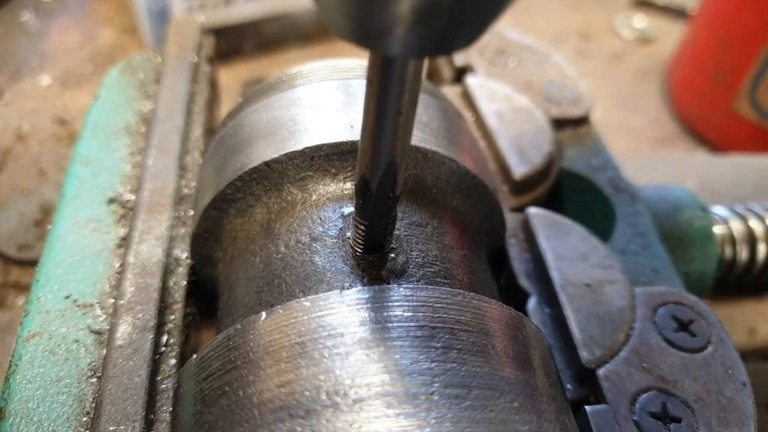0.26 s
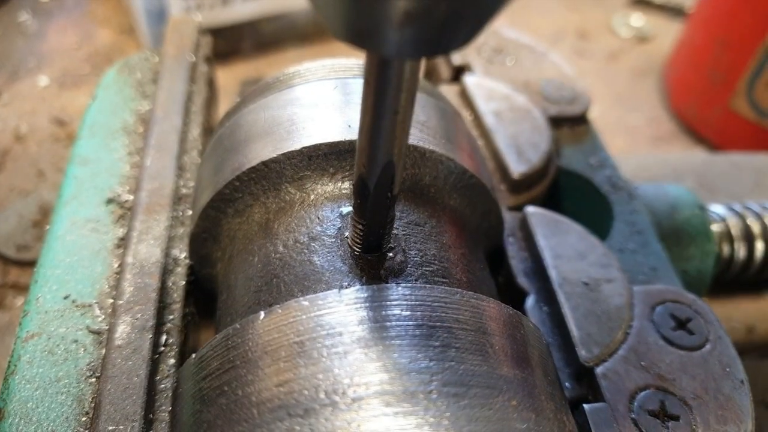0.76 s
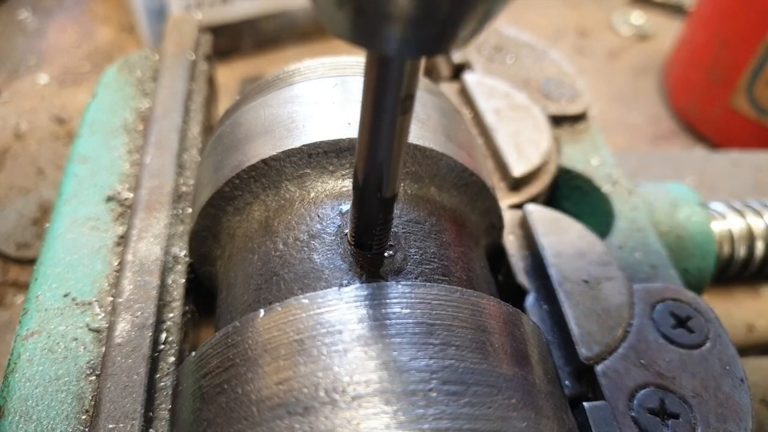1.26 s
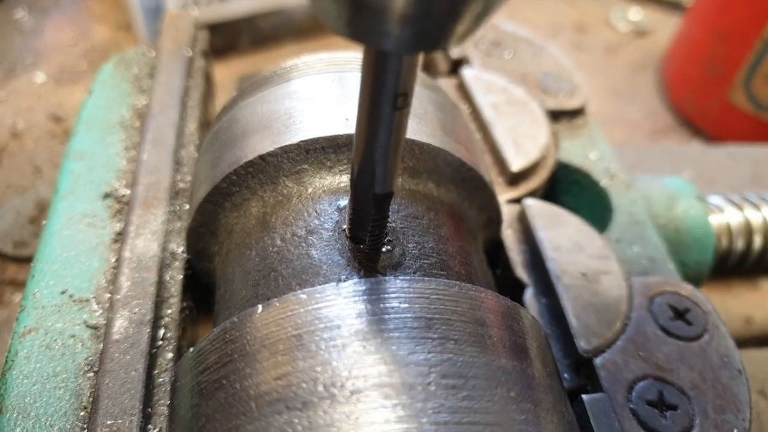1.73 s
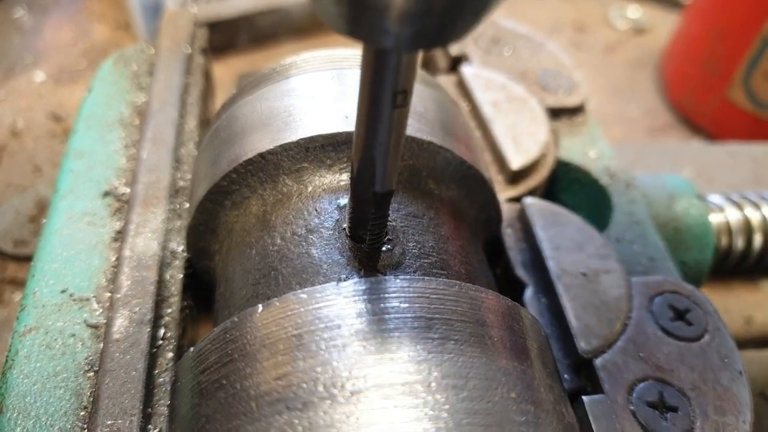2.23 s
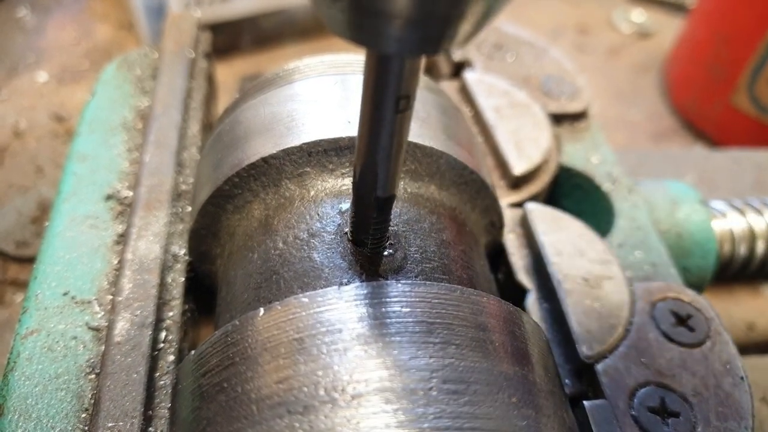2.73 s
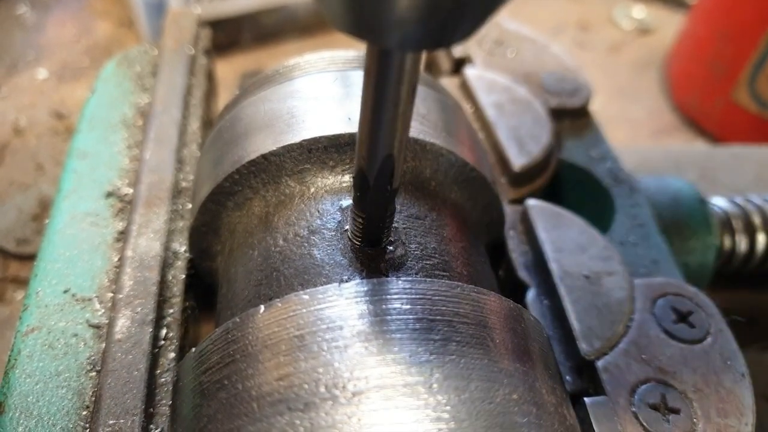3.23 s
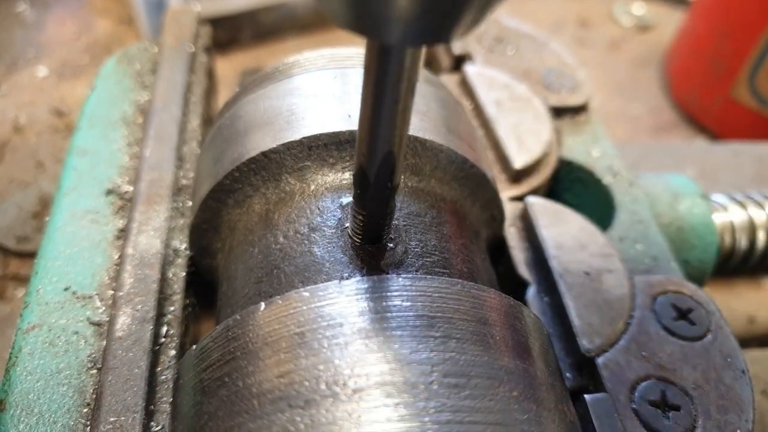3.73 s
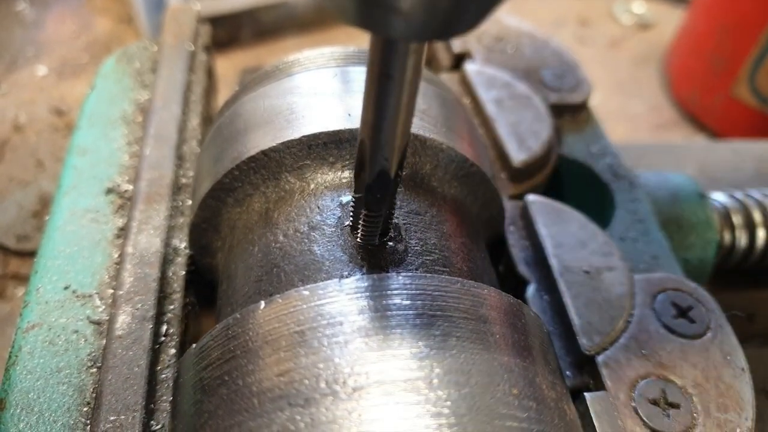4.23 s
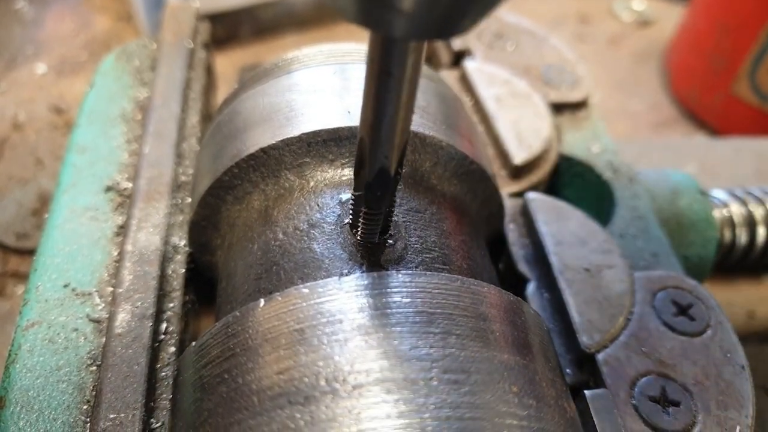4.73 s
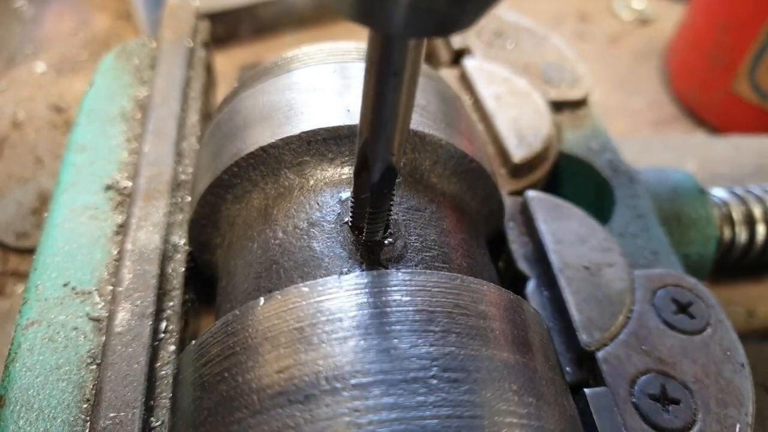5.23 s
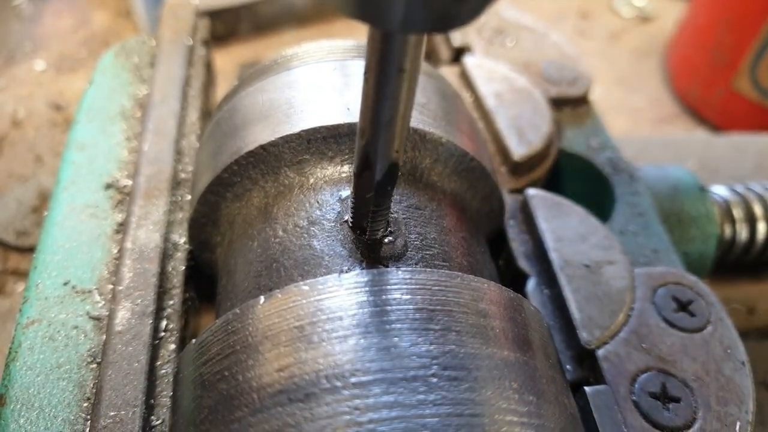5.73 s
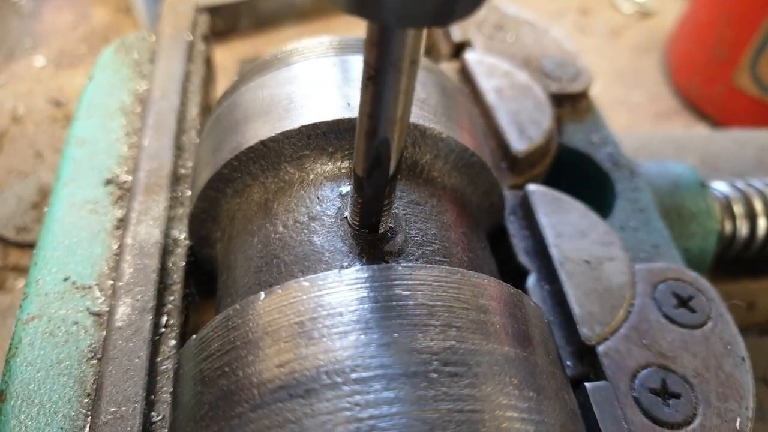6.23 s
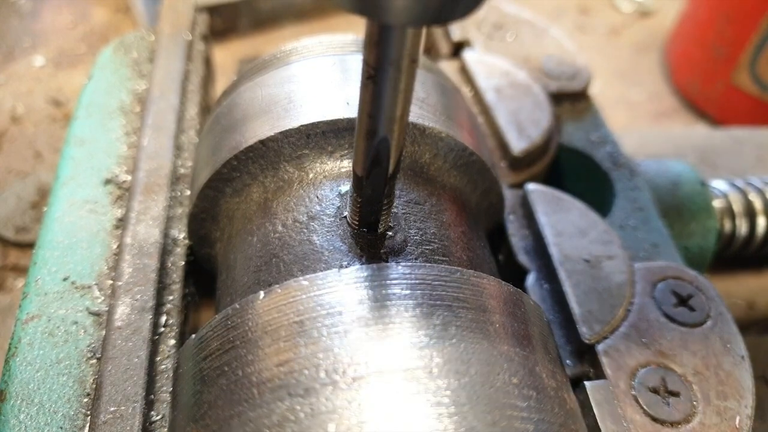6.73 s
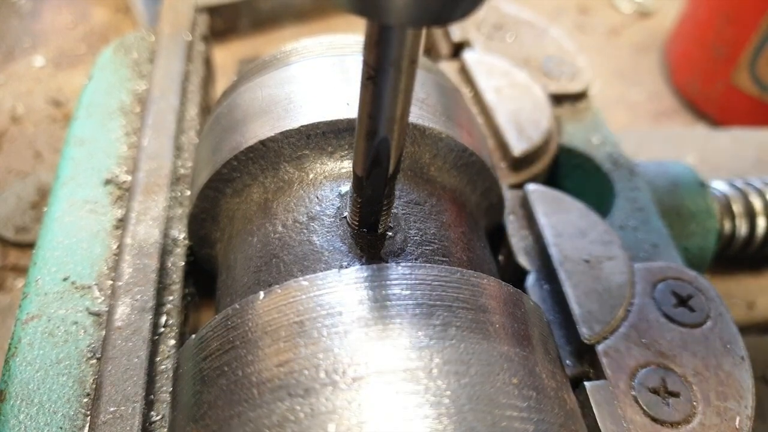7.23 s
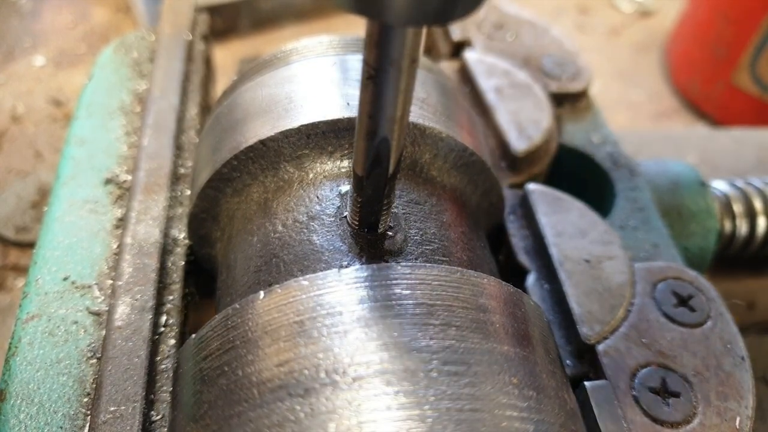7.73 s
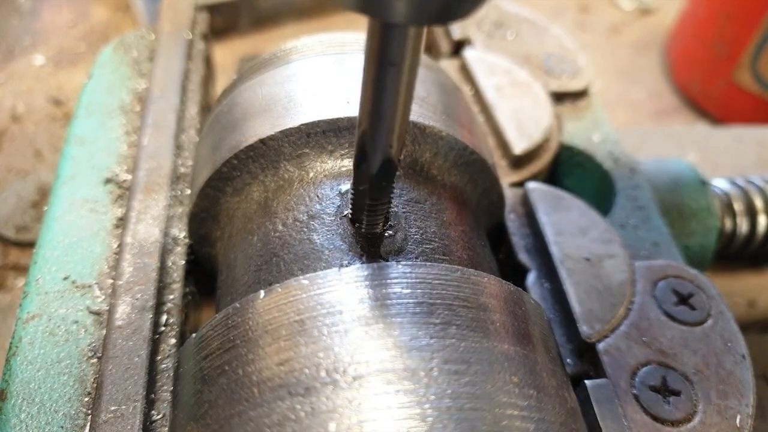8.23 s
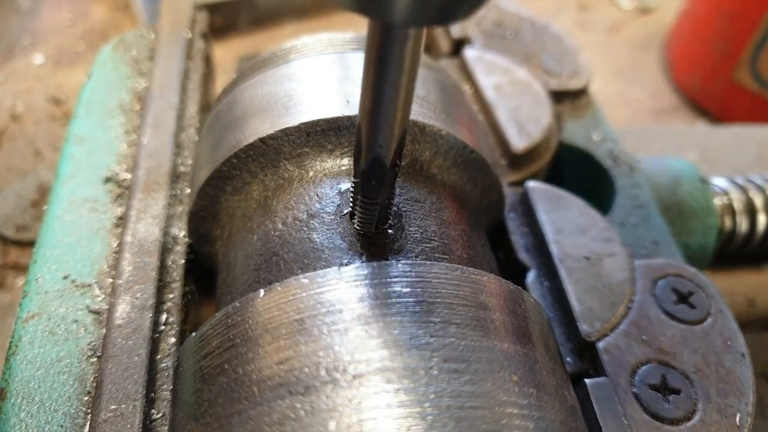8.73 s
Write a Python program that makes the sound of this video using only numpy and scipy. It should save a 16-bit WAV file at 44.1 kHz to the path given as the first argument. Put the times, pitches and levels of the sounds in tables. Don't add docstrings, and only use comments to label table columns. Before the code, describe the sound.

Close-miked metal tapping by hand: a first creaky run of clicks, a long pause with cloth and bench bumps, then more brief bursts about once a second. Each click is a hard, dry snap with a tiny steel ring and little room. After a quiet gap with a faint steel squeak, three stronger bites and one lone snap follow, over low rumble and faint hiss.

```python
import sys
import numpy as np
from scipy import signal
from scipy.fft import rfft, irfft
from scipy.io import wavfile
from scipy.ndimage import uniform_filter1d

SR = 44100
rng = np.random.default_rng(int(sys.argv[2]) if len(sys.argv) > 2 else 0)


def wrap_up_sound(samples):
    columns = np.atleast_2d(samples).T
    tamed = np.clip(columns, -1, 1)
    steps = np.round(tamed * 32767).astype(np.int16)
    wavfile.write(sys.argv[1], SR, steps)


def voltage_ratio(decibels):
    exponent = np.asarray(decibels, float) / 20
    return 10 ** exponent


N = 395350
LEFT_LAG = 18

# frequency in Hz, left level in dB, right level in dB.
CRACK = [(658, -8.5, -8), (1078, -37, -24), (2220, 4.5, -19), (2960, -31, -17.5), (3760, 6, -18.5),
         (5040, 3.5, -25.5), (5460, 1.5, -22), (6480, -22, -19), (7610, -47.5, -20.5), (8800, -27, -4.5),
         (11300, -7, -1), (12700, -6, -3.5), (14800, -8.5, -18), (16290, -54.5, -33)]
# share of the pitch, level in dB, t60 in s.
PART = [(0.998, 4, 0.02), (1.05, -4, 0.018), (1.1, -30.5, 0.013), (0.96, -16.5, 0.0067),
        (1.5, -19.5, 0.012)]
# frequency in Hz, level in dB, t60 in s.
VICE = [(480.3, -7, 0.046), (541, -14, 0.028)]
# frequency in Hz, left level in dB, right level in dB.
LOW = [(22.05, -28.5, -13), (42.2, -1.5, -12), (60.3, -6, 8.5), (82.3, -16, 4), (108, -38, 11.5),
       (130, -7.5, 10), (166.7, -11, 2.5), (202.8, -5, -0.5), (273.3, -18, -22), (288, -10, -18.5),
       (397, -22.5, -26), (482, -24.5, -22.5), (647, -38.5, -32.5), (890, -47.5, -45.5)]
# frequency in Hz, left level in dB, right level in dB.
AIR = [(614, -11, -7), (915, -12, -17), (1410, -7.5, -11.5), (1890, 6, -16.5), (2655, -7.5, -18.5),
       (3570, 10.5, -26), (4300, 6.5, -28.5), (4950, 5, -30), (5800, -19, -18.5), (7880, -35, -26.5),
       (9300, -40.5, -19), (10960, -16.5, -17), (14950, -15.5, -17)]
# start in s, held in s, cavity air in dB, broad rub in dB.
STROKES = [(0, 0.58, -69, -67), (0.463, 0.033, -53, -59.5), (.6, 0.44, -65, -68), (1.025, 0.41, -74, -65.5),
           (1.111, 0.041, -74, -60), (1.215, 0.064, -58, -63), (1.3, 0.37, -70, -67.5),
           (1.66, 0.2, -58, -72), (2.2, 0.24, -59, -69.5), (2.5, 0.25, -64.5, -86), (2.81, 0.37, -62, -77),
           (3.138, 0.04, -59, -70), (3.278, 0.47, -60.5, -72), (3.74, 0.11, -58.5, -65.5),
           (3.9, 0.015, -60, -73), (4.002, 0.5, -63, -91), (5.255, 0.13, -60.5, -85),
           (5.56, 0.23, -65, -86), (5.754, 0.087, -61, -73.5), (6.6, 0.13, -68.5, -77.5),
           (7.555, 0.064, -66, -91), (7.763, 0.082, -64.5, -90), (8.1, 0.37, -66.5, -80.5),
           (8.7, 0.2, -65.5, -76)]
# start in s, force in dB, part ring in dB, vice knock in dB.
SHALLOW_SLIPS = [(0.1018, -29, -47, -76), (0.152, -26, -50, -74), (0.1943, -26, -67, -77),
                 (0.235, -26.5, -47, -69), (0.2729, -27, -56, -72), (0.3124, -24.5, -50, -73),
                 (0.3866, -29.5, -69.5, -60), (2.067, -19.5, -34, -53), (2.259, -26, -37, -53),
                 (2.315, -25.5, -39, -44), (2.367, -23, -37, -44), (2.4272, -22.5, -39.5, -43.5),
                 (2.4669, -20.5, -35.5, -50.5), (3.3671, -23.5, -50, -57), (3.3989, -24, -41, -49.5),
                 (3.4273, -25, -45, -51.5), (3.4521, -24.5, -47, -46), (3.477, -20.5, -46, -49),
                 (3.5012, -24.5, -39, -48), (3.5235, -22, -43, -45.5), (3.5495, -21, -36, -56.5),
                 (4.399, -27, -40.5, -46.5), (4.4176, -27, -47, -52), (4.4339, -25, -36.5, -53),
                 (4.4504, -24, -42, -77), (4.4692, -26, -44, -76), (4.494, -31, -42, -53.5)]
DEEP_SLIPS = [(6.33, -33.5, -44, -46), (6.35, -23.5, -41, -47.5), (6.3708, -25, -36, -50),
              (6.395, -20.5, -47, -54), (6.4243, -23.5, -43.5, -67), (6.4532, -20.5, -36, -50.5),
              (6.5137, -23.5, -43, -53), (7.0357, -20.5, -44.5, -54), (7.4115, -26.5, -40.5, -48),
              (7.4296, -24, -47, -58), (7.4414, -21.5, -40, -44), (7.4556, -22, -59, -52),
              (7.4687, -25, -54, -42), (7.4835, -19.5, -43.5, -62), (7.499, -19.5, -46, -45),
              (7.5147, -20, -45, -40), (7.5341, -19.5, -39.5, -53), (7.5577, -24.5, -44.5, -53),
              (8.4356, -23.5, -65, -66), (8.455, -19, -52, -50), (8.4719, -19, -42, -70),
              (8.4873, -16, -50, -45.5), (8.5035, -15.5, -43, -56), (8.5214, -18.5, -48.5, -67),
              (8.5395, -20, -49, -56), (8.5615, -23.5, -44, -60), (8.5869, -21.5, -48, -55),
              (8.6131, -23, -48, -59), (8.6447, -23.5, -44.5, -66)]


def rms_one(x):
    return x / np.sqrt(np.mean(x ** 2) + 1e-20)


def colour(x, table, low_hz=10, high_hz=20000):
    hz = np.arange(1, 4098) * SR / 8192
    points = np.transpose(table)
    edges_db = -10 * np.log10((1 + (low_hz / hz) ** 12) * (1 + (hz / high_hz) ** 200))
    level_db = np.array([np.interp(np.log(hz), np.log(points[0]), db) + edges_db for db in points[1:]])
    cepstrum = irfft(np.maximum(level_db, -150) * np.log(10) / 20)
    cepstrum[:, 1:4096] *= 2
    cepstrum[:, 4097:] = 0
    impulse = irfft(np.exp(rfft(cepstrum)))
    return signal.oaconvolve(x * np.ones((2, 1)), impulse, axes=1)[:, :N]


def drift(rate_hz):
    r = np.exp(-80 * np.pi * rate_hz / SR)
    slow = signal.lfilter([1], [1, -2 * r, r * r], rng.standard_normal(N // 40 + 2002))[2000:]
    return np.interp(np.arange(N) / 40, np.arange(len(slow)), rms_one(slow))


def even(x, seconds, share):
    power = uniform_filter1d(x ** 2, max(round(seconds * SR), 1)) + 1e-20
    return rms_one(x / power ** (share / 2))


def held(starts, lengths, db, rest_db, rise_s, fall_db_per_s):
    level = np.full(N, float(rest_db))
    sink = fall_db_per_s * np.arange(N) / SR
    for s, length, top_db in zip(starts, lengths, db):
        span = slice(round(s * SR), round((s + length) * SR))
        level[span] = np.maximum(level[span], top_db)
    return uniform_filter1d(np.maximum.accumulate(level + sink) - sink, max(round(rise_s * SR), 1))


def strikes(times, db):
    out = np.full(N, 1e-18)
    out[np.round(np.asarray(times) * SR).astype(int)] = voltage_ratio(db)
    return out


def fade(clicks, t60, rise_s):
    r = voltage_ratio(-60 / (t60 * SR))
    soft = np.exp(-1 / (rise_s * SR))
    return signal.lfilter([1 - soft], [1, -soft], signal.lfilter([1], [1, -r], clicks))


def ring(times, db, modes, spread_db, rise_s):
    out = 0
    chance = rng.standard_normal((len(times), len(modes), 2))
    last = np.searchsorted(times, np.arange(N) / SR).clip(1) - 1
    for k, (hz, level_db, t60) in enumerate(modes):
        height = fade(strikes(times, db + level_db + spread_db * chance[:, k, 0]), t60, rise_s)
        detuned_hz = hz * (1 + 0.016 * chance[last, k, 1])
        out = out + height * np.sin(2 * np.pi * np.cumsum(detuned_hz) / SR)
    return out


def chime(times, db, modes, pitch_hz, spread_db, rise_s):
    out = np.zeros(N + 4000)
    t = np.arange(4000) / SR
    share, level_db, t60 = np.transpose(modes)[:, :, None]
    chance = rng.standard_normal((len(times), len(modes), 1))
    shape = voltage_ratio(level_db - 60 * t / t60) * (1 - np.exp(-t / rise_s))
    for s, top_db, hz, luck in zip(times, db, pitch_hz, chance):
        at = round(s * SR)
        modes_now = voltage_ratio(top_db + spread_db * luck) * shape * np.sin(2 * np.pi * share * hz * t)
        out[at:at + 4000] += modes_now.sum(0)
    return out[:N]


def room_air(grain):
    band_edges_hz = [520, 1150, 1650, 2400, 3100, 4600, 5600, 6900]
    s, length, air_db, _ = np.transpose(STROKES)
    left_db = held(s, length, air_db, rest_db=-72, rise_s=0.02, fall_db_per_s=65.5) + 3 + 1.2 * drift(25)
    air = np.zeros((2, N))
    for low_hz, high_hz in zip(band_edges_hz, band_edges_hz[1:]):
        air += colour(grain[:2], AIR, low_hz, high_hz) * voltage_ratio(1.7 * drift(14) + 0.85 * drift(25))
    return np.array([voltage_ratio(left_db) * rms_one(air[0]), voltage_ratio(-80) * rms_one(air[1])])


def cloth_rub(grain):
    # frequency in Hz, level in dB.
    rub_colour = [(500, 1), (900, -7), (1500, 2.5), (2500, 0.5), (5800, 0), (6500, -10), (7000, -21.5)]
    s, length, _, rub_db = np.transpose(STROKES)
    rub_db = held(s, length, rub_db, rest_db=-82.5, rise_s=0.02, fall_db_per_s=65.5)
    cloth = grain[2] * voltage_ratio(1.2 * drift(60))
    top = voltage_ratio(-10 * (np.arange(N) > 1.59 * SR))
    body = colour(cloth, rub_colour, low_hz=400, high_hz=5400)
    full = colour(cloth, rub_colour, low_hz=400, high_hz=7000)
    rub = rms_one((1 - top) * body + top * full)
    return voltage_ratio(rub_db + 8 + 1.2 * drift(12)) * rub * [[1], [.025]]


def hiss(grain):
    return voltage_ratio(-81.5) * rms_one(colour(grain[2:], AIR, low_hz=8000, high_hz=14600))


def hand_effort():
    # start in s, held in s, level in dB.
    heaves = [(0, 0.25, -35), (.25, 0.12, -26), (.45, .22, -41.5), (1.122, 0.22, -39.5),
              (1.58, 0.066, -38.5), (1.749, 0.39, -35), (2.218, 0.28, -28.5), (2.549, 0.13, -34),
              (3.31, .08, -32.5), (3.398, 0.14, -28.5), (3.6, 0.21, -36.5), (4.331, 0.14, -26.5),
              (4.561, 0.077, -34), (5.3, 0.22, -52), (5.78, 0.16, -42.5), (6.314, 0.17, -24),
              (6.58, 0.11, -33), (6.8, 0.47, -33), (7.369, 0.18, -27), (7.651, 0.27, -44),
              (7.88, 0.43, -35.5), (8.38, 0.25, -28.5), (8.699, 0.1654, -37.5)]
    return held(*np.transpose(heaves), rest_db=-51, rise_s=0.013, fall_db_per_s=161)


def tremble(low, effort_db):
    # frequency in Hz, level above the effort in dB, t60 in s.
    swing_modes = [(131, -1.5, 0.073)]
    shake = voltage_ratio(effort_db - 4.5 + 1.8 * drift(10.8)) * even(low[1], seconds=.04, share=.6)
    slip_s = np.transpose(SHALLOW_SLIPS + DEEP_SLIPS)[0]
    slip_effort_db = effort_db[(slip_s * SR).astype(int)]
    shake += ring(slip_s, slip_effort_db, swing_modes, spread_db=-4.0, rise_s=0.0016)
    return shake * [[-.06], [1]]


def hum(low, effort_db):
    # start in s, held in s, level above rest in dB.
    swells = [
        (0.2, 0.15, -2),
        (1.55, 0.31, 2.5),
        (2.75, 0.27, 3),
        (3.55, 0.32, 4.5),
        (4.15, 0.18, 2.5),
        (5.2, 0.17, 5.5),
        (7.4, 0.18, -3),
        (8.4, 0.31, 1),
    ]
    swell_db = held(*np.transpose(swells), rest_db=0, rise_s=0.053, fall_db_per_s=40)
    follow_db = 0.13 * (effort_db - effort_db.mean())
    return voltage_ratio(-49.5 + swell_db + follow_db + 2.0 * drift(13.0)) * rms_one(low[0]) * [[1], [-.2]]


def sway(effort_db):
    slow = colour(rng.standard_normal(N), LOW, high_hz=96.46)[1]
    sway_db = -51 + 0.079 * (effort_db - effort_db.mean()) + 2.0 * drift(4.1)
    return voltage_ratio(sway_db) * even(slow, seconds=0.09, share=0.46) * [[-.1], [1]]


def cracks(s, burst, crack_db, vice_db, teeth_db, edge_db, edge_left_db):
    dry_crack = fade(strikes(s, crack_db + 1.0), t60=0.0043, rise_s=0.000324)
    knock = fade(strikes(s, vice_db + 9.5), t60=0.01645, rise_s=0.00057)
    teeth = fade(strikes(s, teeth_db + 12.0), t60=0.015, rise_s=.0002)
    edge = [fade(strikes(s, edge_db + 19 + side_db), t60=0.007, rise_s=0.00031)
            for side_db in (edge_left_db, -.3 * edge_left_db)]
    out = colour(burst * dry_crack, CRACK, low_hz=1260, high_hz=5580)
    out += colour(burst * knock, CRACK, low_hz=570, high_hz=1337)
    out += colour(burst * teeth, CRACK, low_hz=5560, high_hz=7030)
    return out + colour(burst * edge, CRACK, low_hz=8100)


def after_sound(s, noise, force_db):
    # frequency in Hz, left level in dB, right level in dB.
    after_colour = [(710, -25.5, -25), (1100, -30.5, -30.5), (2110, -10.5, -23), (2830, -23.5, -32.5),
                    (3380, -13.5, -33.5), (5090, -14, -27), (5800, -21.5, -38), (6740, -24, -45.5),
                    (7540, -41.5, -57), (8360, -51, -29), (10160, -31, -24.5), (12600, -21, -24.5),
                    (14200, -23.5, -25), (14940, -33.5, -59), (16070, -59, -70.5)]
    near = fade(strikes(s, 2 * force_db - 1.5), t60=0.024, rise_s=0.006)
    far = fade(strikes(s, 2 * force_db - 25.0), t60=0.17, rise_s=0.0036)
    return colour(noise * np.sqrt(near + far), after_colour, high_hz=14800)


def teeth_ring(s, teeth_db, teeth_hz, upper_db, upper_hz):
    # share of the pitch, level in dB, t60 in s.
    lower_modes = [(0.99, -0.5, 0.0065), (1.034, -10, 0.0068), (0.84, -25, .006), (0.91, -29, .006)]
    upper_modes = [(1, -9.5, 0.0041), (0.98, -6, 0.011)]
    lower = chime(s, teeth_db + 12.0, lower_modes, teeth_hz, spread_db=3.5, rise_s=0.00029)
    upper = chime(s, teeth_db + 5.5 + upper_db, upper_modes, upper_hz, spread_db=0.5, rise_s=0.00054)
    return lower * voltage_ratio([[0], [-18]]) + upper * voltage_ratio([[0], [-16]])


def jaw_and_core(s, crack_db):
    # frequency in Hz, level in dB, t60 in s.
    jaw_modes = [(4080, -24, 0.011)]
    core_modes = [(3540, -23, 0.049), (3840, -12.5, 0.011), (4087, -13.5, 0.021), (4190, -25.5, 0.013),
                  (4870, -13, 0.01), (5520, -11.5, 0.0084)]
    unit_hz = np.ones(len(s))
    jaw = chime(s, crack_db, jaw_modes, unit_hz, spread_db=2.0, rise_s=0.00045)
    core = chime(s, crack_db - 2.0, core_modes, unit_hz, spread_db=0.5, rise_s=0.00019)
    return jaw * [[0], [1]] + core * voltage_ratio([[0], [-19]])


def part_ring(s, part_db, part_hz, noise):
    rough = voltage_ratio(3 * rms_one(uniform_filter1d(noise, 150)))
    blow = chime(s, part_db - 18.5, PART, part_hz, spread_db=7.5, rise_s=0.00028)
    built = chime(s + 0.001822, part_db, PART, part_hz, spread_db=2.5, rise_s=0.0014)
    return blow * [[1], [0]] + built * rough * voltage_ratio([[0], [-19]])


def vice_ring(s, vice_db):
    vice = ring(s, vice_db - 2.5, VICE, spread_db=1.5, rise_s=0.0016)
    return np.array([-.5 * np.roll(vice, -LEFT_LAG), vice])


def shank_ring(s):
    # frequency in Hz, level in dB, t60 in s.
    shank_modes = [(2940, 0, .1), (4700, -10, .05), (6600, -15, .06), (9060, 1, .12), (9250, -3, .04)]
    # time in s, level in dB.
    depth_levels = [
        (.3, -50),
        (.39, -70),
        (2.07, -50.5),
        (2.4, -59.5),
        (4.45, -71),
        (6.4, -59.5),
        (8.5, -67),
    ]
    shank_db = np.interp(s, *np.transpose(depth_levels))
    return ring(s, shank_db, shank_modes, spread_db=3, rise_s=.0005) * voltage_ratio(2.5 * drift(120)) * [[.08], [1]]


def slips():
    # start in s, crack above force in dB, left bright edge in dB, upper teeth in dB, their pitch in Hz.
    bites = [(0, -1, 1.5, -3, 6330), (.35, 6.5, 1, -18, 6300), (2.0, 1.5, 2.5, 1, 6340),
             (2.2, 5, 1.5, -33, 6170), (3.3, 0.5, -7, -8, 6400), (3.44, 2, -2.5, -5, 6700),
             (4.3, 3, 1, -9.5, 6020), (6.2, 2, 1, 1.5, 6480), (6.9, 1.5, 3, -9, 6300),
             (7.3, 1.5, 2, -6.5, 6400), (8.3, -0.5, 4, -9.5, 6330)]
    # teeth in dB, bright edge in dB.
    slip_rings = [(-32.5, -44), (-35.5, -37), (-35, -35), (-39, -37), (-32.5, -36), (-38, -35.5),
                  (-31, -40), (-39, -36), (-48, -36.5), (-47, -32.5), (-60, -29), (-40.5, -28.5),
                  (-41.5, -29), (-30.5, -36.5), (-32.5, -36), (-39, -31), (-35, -29.5), (-33, -28),
                  (-33.5, -28), (-32, -28), (-36.5, -27), (-39, -44), (-31, -37.5), (-31, -38.5),
                  (-27, -37), (-32.5, -34.5), (-33, -34.5),
                  (-37, -39.5), (-29.5, -33.5), (-30.5, -35.5), (-26, -32.5), (-25.5, -35), (-28.5, -34),
                  (-30, -37.5), (-39.5, -38.5), (-37, -40), (-34.5, -36.5), (-34.5, -34), (-28.5, -40),
                  (-33.5, -32), (-32.5, -31), (-29, -31), (-34, -30.5), (-31, -34), (-31.5, -32.5),
                  (-38, -44.5), (-29.5, -37), (-29.5, -34.5), (-30, -32.5), (-31.5, -31), (-30, -42.5),
                  (-32.5, -33.5), (-28.5, -38), (-28, -36), (-27, -36), (-32.5, -37)]
    # part in Hz, teeth in Hz.
    slip_hz = [(1990, 5820), (2160, 5720), (2150, 5860), (2170, 5850), (2100, 5830), (2020, 6050),
               (2110, 5760), (2070, 6060), (2100, 5920), (1950, 5880), (1970, 5660), (2050, 5810),
               (2040, 5890), (2090, 5980), (2100, 5970), (2010, 5970), (2120, 6020), (2010, 6020),
               (1990, 6060), (2000, 5810), (2020, 6100), (2080, 5870), (2060, 5780), (2000, 5850),
               (2000, 5800), (2090, 5870), (2080, 5820),
               (2070, 6040), (2060, 6010), (2040, 6070), (2020, 6060), (2140, 6050), (2090, 6040),
               (2050, 6010), (2030, 5730), (2080, 6090), (2080, 6010), (2120, 5940), (2010, 5850),
               (2160, 5940), (2080, 5950), (2070, 5940), (2060, 6040), (1950, 5910), (2030, 6020),
               (2130, 5840), (2100, 5910), (2060, 5860), (2120, 5890), (2070, 5870), (2040, 5860),
               (2060, 5870), (2080, 5880), (2050, 5860), (2070, 5870), (2110, 5870)]
    # frequency in Hz, left level in dB, right level in dB.
    cavity_dip = [(6530, 0, -1), (7170, -8.5, -1.5), (7670, -5.5, 1), (8630, 0.5, 0.5), (14600, -0.5, -1.5),
                  (15150, -6.5, -6.5)]
    s, slip_db, part_db, vice_db = np.transpose(SHALLOW_SLIPS + DEEP_SLIPS)
    part_db, vice_db = part_db + 9.5, vice_db + 24
    teeth_db, edge_db = np.transpose(slip_rings)
    part_hz, teeth_hz = np.transpose(slip_hz)
    bite = np.searchsorted(np.array(bites)[:, 0], s) - 1
    _, above_db, edge_left_db, upper_db, upper_hz = np.array(bites)[bite].T
    crack_db = slip_db + above_db
    noise = rng.standard_normal((4, N))
    burst = 0.57 * noise[0] + 0.53 * noise[1:3]
    out = cracks(s, burst, crack_db, vice_db, teeth_db, edge_db, edge_left_db)
    out += after_sound(s, noise[2:], slip_db + 1.5)
    out += teeth_ring(s, teeth_db, teeth_hz, upper_db, upper_hz)
    out += jaw_and_core(s, crack_db)
    out += part_ring(s, part_db, part_hz, noise[3])
    return colour(out, cavity_dip) + vice_ring(s, vice_db) + shank_ring(s)


def bench_jolts():
    # time in s, peak in dB, pitch in Hz, length in ms; lighter ones last.
    jolt_rows = [(0.332, -25, 122, 14), (0.355, -18, 108, 7.8), (1.632, -30, 71.4, 17),
                 (1.76, -15, 121.4, 13.8), (1.78, -23.5, 112, 9), (1.868, -23.5, 109, 17),
                 (1.964, -21.5, 124, 16), (2.088, -21.5, 107.7, 5.5), (2.108, -22.5, 117, 6.8),
                 (2.388, -14.5, 118, 16.7), (2.455, -20, 122, 26), (3.486, -23, 130, 5.5),
                 (3.688, -21, 97, 15), (4.271, -21.5, 73, 13), (4.506, -23.5, 131, 13.6),
                 (4.642, -15, 108, 12.7), (4.663, -22.5, 103, 15), (4.853, -31.5, 85, 9.9),
                 (5.509, -39, 61.7, 12), (6.028, -26, 64.6, 19), (6.287, -25, 123, 5.9),
                 (6.474, -32.5, 129, 27), (6.809, -24, 119.5, 13.5), (7.049, -13, 130, 18.4),
                 (7.177, -21.5, 117, 15), (7.495, -21.5, 114, 7.8), (7.907, -19, 124, 7.4),
                 (8.149, -25.5, 113.4, 25), (8.481, -21, 122.6, 32), (8.74, -20.5, 125.6, 15.6),
                 (2.226, -30.5, 100, 18), (2.621, -31, 128, 32), (3.319, -30, 130, 15),
                 (3.712, -25, 109, 9.6), (3.776, -29, 100, 16), (4.59, -25, 104.8, 7.7),
                 (6.1, -32, 105, 25), (6.303, -27, 122, 10.6), (6.656, -31.5, 107, 7.3),
                 (7.925, -26, 125.3, 11), (8.398, -30.5, 100, 18), (8.499, -25, 117, 7.4),
                 (8.763, -26.5, 115, 17)]
    shake = np.zeros(N)
    t = np.arange(-2000, 4000) / SR
    for (s, db, hz, ms), turn in zip(jolt_rows, rng.random(len(jolt_rows))):
        width_s = max(ms, 5) * np.where(t < 0, .00055, .0008)
        swell = np.exp(-(t / width_s) ** np.where(t < 0, 4, 2))
        at = round(s * SR) - 2000
        shake[at:at + 6000] += (voltage_ratio(db) * swell * np.cos(2 * np.pi * (hz * t + turn)))[:N - at]
    return shake * [[-.06], [1]]


def cloth_chafes(grain):
    # time in s, frequency in Hz, level in dB, t60 in s.
    chafe_rows = [(0.466, 2400, -53, 0.64), (1.025, 2260, -57, 0.25), (1.11, 2980, -54, 0.25),
                  (1.215, 2970, -53.5, .3), (1.37, 4300, -53.5, 0.45), (2.81, 1400, -65.5, 1),
                  (3.8, 2070, -63, 0.48), (3.9, 3430, -50, 0.23), (3.9, 5400, -56.5, 0.38),
                  (4.25, 5130, -63, 0.36), (7.76, 4630, -58.5, 0.54)]
    spread = 1.066
    out = np.zeros((2, N))
    for s, hz, db, t60 in chafe_rows:
        band = signal.butter(2, [hz / spread, hz * spread], "band", fs=SR, output="sos")
        out[0] += rms_one(signal.sosfilt(band, grain[3])) * fade(strikes([s], db), t60, rise_s=0.0027)
    return out


def chip_scuffs(grain):
    # time in s, level in dB, t60 in s.
    scuff_rows = [
        (1.2, -66, 0.95),
        (3.158, -56.5, 0.5),
        (3.297, -50.5, .25),
        (3.903, -53.5, 0.27),
    ]
    scuffs = sum(fade(strikes([s], db), t60, rise_s=.004) for s, db, t60 in scuff_rows)
    return colour(grain[2:] * scuffs, CRACK, low_hz=7470, high_hz=14600)


def vice_knocks():
    # time in s, ring in dB, tick in dB.
    knock_rows = [(1.614, -50, -56), (1.75, -55.5, -47.5), (3.672, -44, -76.5), (4.258, -47, -46.5),
                  (4.335, -20, -47), (4.621, -33, -91), (6.011, -68, -61), (6.285, -35, -94),
                  (6.625, -62, -54), (6.678, -53, -53), (7.038, -62, -45), (7.899, -27, -80),
                  (8.141, -40, -80), (8.72, -33, -79)]
    s, ring_db, tick_db = np.transpose(knock_rows)
    knocks = ring(s, ring_db + 3, VICE, spread_db=0.0, rise_s=0.0045) * [[-.6], [1]]
    part_hz = np.full(len(s), 2060)
    knocks[0] += chime(s, (ring_db + tick_db) / 2 - 3, PART, part_hz, spread_db=5.5, rise_s=0.0019)
    band = signal.butter(2, [120, 420], "band", fs=SR, output="sos")
    dull = signal.sosfilt(band, strikes(s, tick_db + 40.5))
    return knocks + dull * [[.8], [1]]


def squeaks():
    # start in s, end in s, frequency in Hz, level in dB.
    squeak_rows = [
        (5.262, 5.425, 4985, -60.5),
        (5.265, 5.345, 3068, -62.5),
        (5.265, 5.325, 13400, -68),
    ]
    out = np.zeros((2, N))
    t = np.arange(N) / SR
    for start, end, hz, db in squeak_rows:
        gate = np.clip(np.minimum(t - start, end - t) / 0.02, 0, 1)
        out[0] += voltage_ratio(db - 1.5 + 2 * drift(60)) * gate * np.sin(2 * np.pi * hz * t + 1.3 * drift(30))
    return out


def chip_ticks(grain):
    # time in s, level in dB.
    tick_rows = [
        (5.878, -43),
        (7.0414, -24),
    ]
    s, db = np.transpose(tick_rows)
    return colour(grain[:2] * fade(strikes(s, db + 2.5), t60=0.011, rise_s=0.00013), CRACK, high_hz=6900)


def scene():
    grain = rng.standard_normal((4, N))
    air = room_air(grain) + cloth_rub(grain) + hiss(grain) + slips()
    air += cloth_chafes(grain) + chip_scuffs(grain) + squeaks() + chip_ticks(grain)
    air[0] = np.roll(air[0], LEFT_LAG)
    white = rng.standard_normal((2, N))
    low = colour(np.array([white[0], 1.1 * white[1] - 0.38 * white[0]]), LOW, high_hz=1283)
    effort_db = hand_effort()
    bench = tremble(low, effort_db) + hum(low, effort_db) + sway(effort_db)
    return air + bench + bench_jolts() + vice_knocks()


def band_limit(x):
    return signal.sosfilt(signal.butter(12, 16550, fs=SR, output="sos"), x)


def record(dry):
    mix = signal.sosfilt(signal.butter(8, 16200, fs=SR, output="sos"), dry)
    return band_limit(mix)


dry = scene()
out = record(dry)
wrap_up_sound(out)
```